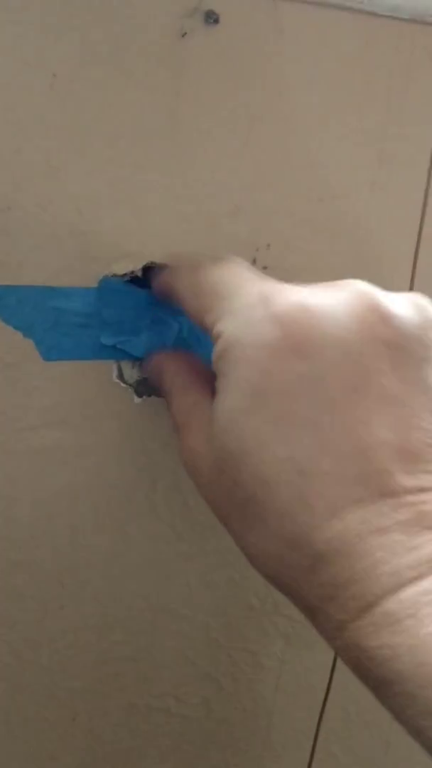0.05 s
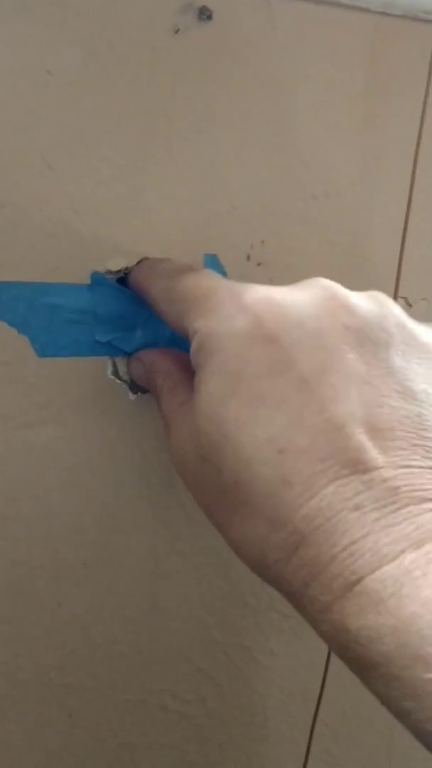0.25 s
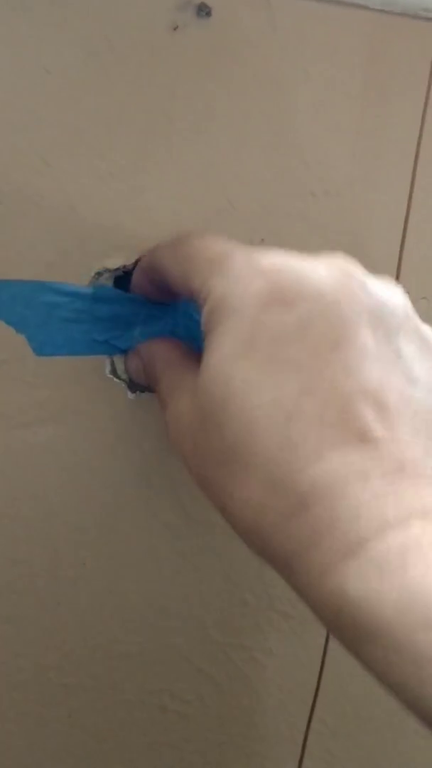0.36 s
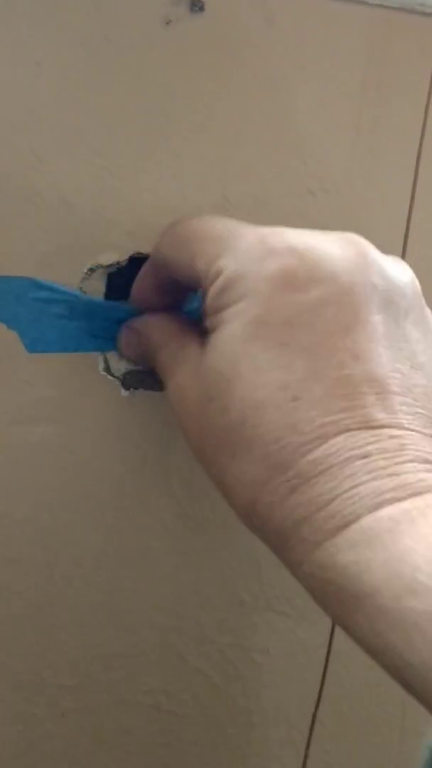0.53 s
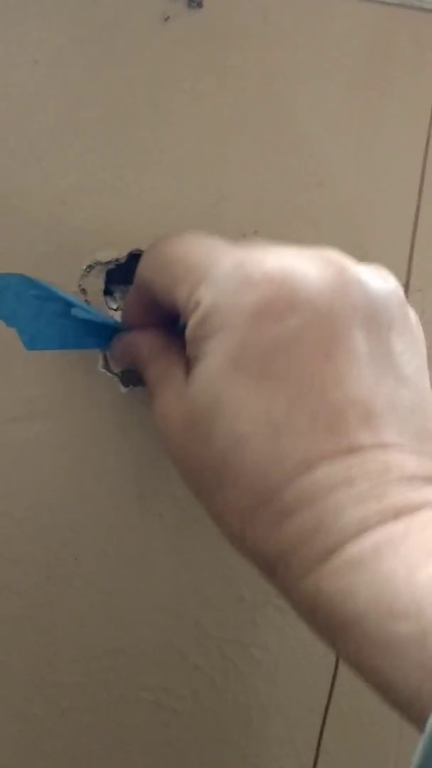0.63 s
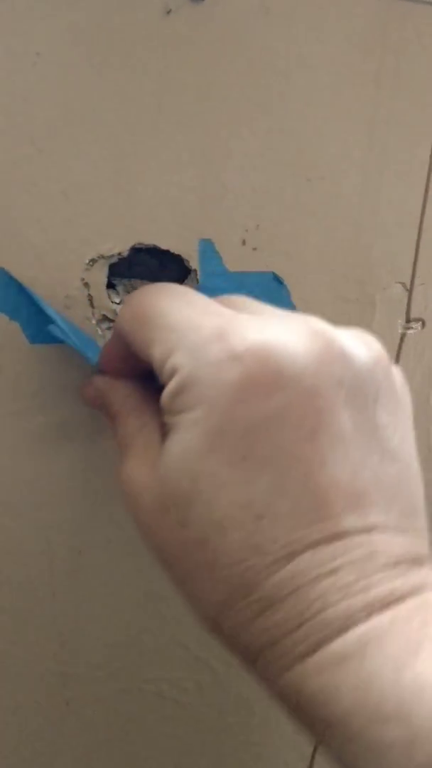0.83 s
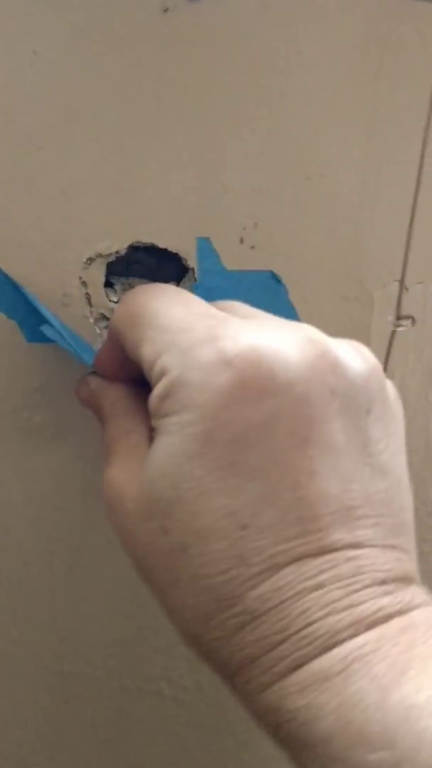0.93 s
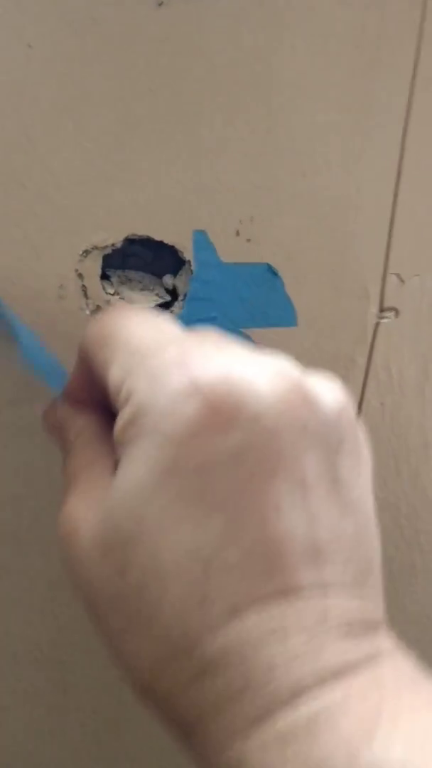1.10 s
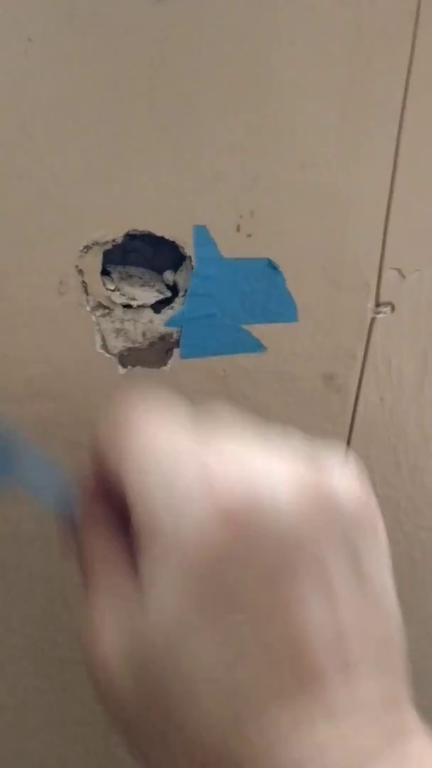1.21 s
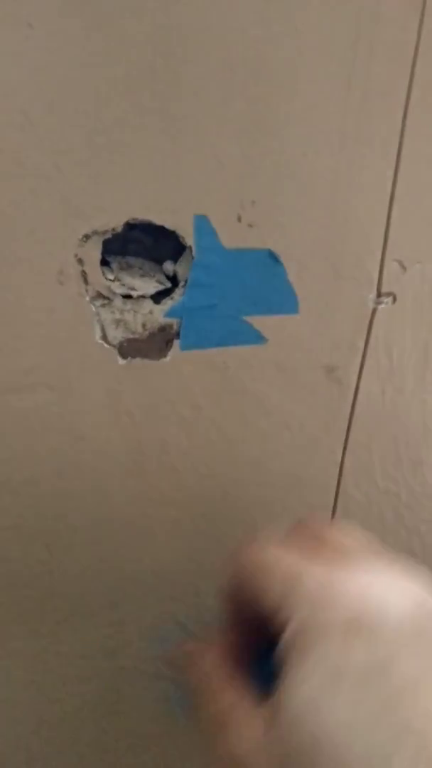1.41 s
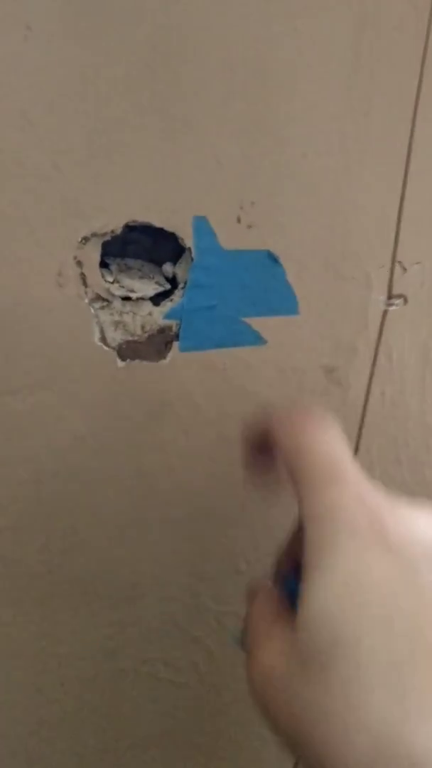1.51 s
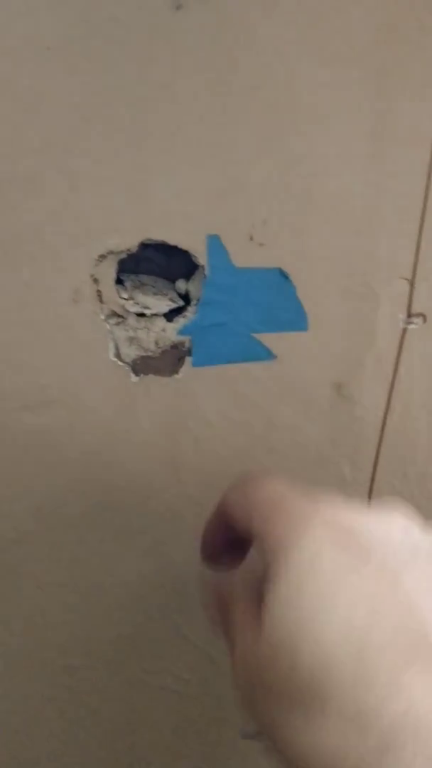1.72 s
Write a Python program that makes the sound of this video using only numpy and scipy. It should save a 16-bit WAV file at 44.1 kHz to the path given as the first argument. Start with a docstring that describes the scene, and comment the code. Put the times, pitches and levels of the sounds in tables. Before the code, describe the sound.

Close, dry crackling of painter's tape peeling from a wall, irregular snaps and soft hollow thumps of the board, a near-quiet gap, then brighter crumpling of the freed strip, indoors with faint air noise.

```python
"""Sharp snaps and dense crackle: painter's tape is peeled by hand off a hollow plaster wall, close to a phone.
Glue letting go is noise in three coloured regions: single bursts for the snaps, runs of tiny slips for the peel.
The pull knocks and drums the wall board, heard as its ringing modes; faint air noise lies behind.
Two microphone ports, each less the other after a short delay, make the stereo picture."""
import sys
import numpy as np
from scipy import signal
from scipy.fft import rfft, irfft, next_fast_len
from scipy.io import wavfile
from scipy.ndimage import map_coordinates

SR = 44100
rng = np.random.default_rng(int(sys.argv[2]) if len(sys.argv) > 2 else 0)


def magnitude_from_level(level_db):
    """Linear magnitude for a level in decibels (20 dB per decade)."""
    exponent = np.asarray(level_db, float) / 20
    return 10 ** exponent


def unload_audio(sound):
    """Save the sound as a 16-bit wav file, at the path given as the first command line argument."""
    columns = np.transpose(np.atleast_2d(sound))
    # keep every value between -1 and 1, then stretch to whole-number steps
    steps = np.round(np.clip(columns, -1, 1) * 32767)
    wavfile.write(sys.argv[1], SR, steps.astype(np.int16))


N = 77175  # 1.75 s

# single snaps of the glue, relative levels: start_s, near_3khz_db, near_6khz_db, near_12khz_db
SNAP_EVENTS = [(0.0115, -37, -51, -46.5), (0.2158, -40.5, -32, -33), (0.251, -46, -37, -44),
               (0.299, -38, -64, -66), (0.3425, -68, -34.5, -27.5), (0.3685, -42.5, -32, -36),
               (0.378, -38.5, -41, -60), (0.4046, -40, -39, -41.5), (0.4185, -39, -48, -66),
               (0.4932, -45.5, -39.5, -32.5), (0.5523, -48, -42, -28.5), (0.5609, -37.5, -16, -25),
               (0.5629, -28.5, -22.5, -40), (0.5957, -55, -31.5, -36), (0.597, -27, -33, -55),
               (0.6408, -64, -44, -37.5), (0.654, -37.5, -38.5, -42.5), (0.6765, -51, -41, -42),
               (0.708, -53, -46, -43), (0.719, -56, -43, -48), (0.781, -44, -39, -46),
               (0.7927, -47, -40, -42), (0.8016, -45, -40.5, -35), (0.811, -37.5, -43, -51),
               (0.8538, -45.5, -47, -38), (1.1208, -34, -38, -60), (1.122, -44, -39.5, -49),
               (1.139, -57, -49, -48), (1.1659, -40.5, -40.5, -38), (1.466, -40, -36, -47),
               (1.4739, -35, -51, -38), (1.4789, -32.5, -34, -48), (1.4916, -37, -26.5, -27.5),
               (1.505, -62, -47, -49), (1.5561, -44.5, -39.5, -63), (1.6702, -38.5, -42, -44),
               (1.6845, -36, -43.5, -44.5), (1.748, -36, -41.5, -55)]
# decay of a snap, one entry per tape region: t60_s
SNAP_T60_S = [
    [[.011]],
    [[.004]],
    [[.0025]],
]
# running peel, relative levels: time_s, near_3khz_db, near_6khz_db, near_12khz_db
PEEL_CURVES = [(0, -61, -57, -79), (0.02, -50, -62, -55), (0.04, -61, -70, -77), (0.1, -63, -70, -65),
               (0.122, -58, -55, -49), (0.128, -60, -72, -69), (0.157, -62.5, -63, -72),
               (0.175, -54.5, -50.5, -52), (0.2, -56.5, -57, -48), (0.21, -49, -75, -66),
               (0.24, -52, -53, -59), (0.262, -43, -42, -47), (0.285, -47, -49.5, -57),
               (0.33, -58, -65, -65), (0.36, -49, -77, -51), (0.39, -55.5, -57, -57),
               (0.43, -58.5, -63, -66), (0.54, -69, -58.5, -56), (0.575, -51, -42, -52),
               (0.62, -44, -47.5, -68), (0.672, -50.5, -50.5, -65), (0.681, -51, -41.5, -49),
               (0.697, -61, -55.5, -61), (0.712, -46, -42, -47), (0.74, -58, -57, -62),
               (0.78, -57, -58, -54.5), (0.82, -51.5, -55.5, -54.5), (0.87, -68.5, -67, -64.5),
               (1.0, -65.5, -62.5, -61.5), (1.06, -57, -56.5, -56), (1.17, -51, -51.5, -49),
               (1.19, -65, -60, -64), (1.28, -69, -69, -75), (1.31, -61.5, -57.5, -47.5),
               (1.332, -61, -46, -36.5), (1.36, -57, -51, -50), (1.38, -72, -61, -54),
               (1.404, -56, -50, -47), (1.41, -55, -40.5, -48), (1.433, -49.5, -43, -42),
               (1.44, -59, -60, -49), (1.454, -44, -36, -33.5), (1.465, -48.5, -42, -42),
               (1.496, -54, -42.5, -42.5), (1.501, -66.5, -56, -50), (1.56, -63.5, -55.5, -59.5),
               (1.72, -61, -62.5, -61), (1.75, -49.5, -55, -74)]
# colour of the tape in three regions, low to high: freq_hz, gain_db
TAPE_REGIONS = [
    [(300, -23), (800, -10.5), (1200, -13.5), (1700, -4.5), (3200, 1.5), (4200, 0.5), (5200, -40)],
    [(3600, -42), (4500, -8.5), (7000, 5), (8300, -4.5), (9600, -13)],
    [(7600, -9.5), (8800, 3), (12500, 3), (14500, 4.5), (15700, 1), (17000, -43)],
]
# recolouring of the strip once off the wall and crumpled in the fingers: freq_hz, gain_db
FREE_COLOUR = [(2200, 3), (3200, -1.5), (4500, 8), (5500, 2), (7200, -4.5), (9000, -2)]
# tugs that knock the board, relative levels: start_s, level_db, centre_hz (modes struck hardest)
KNOCK_EVENTS = [(0.1214, -23.5, 487), (0.2987, -26, 159), (.342, -28, 755), (.376, -27, 770),
                (.403, -28.5, 1000), (0.5603, -19.5, 650), (.565, -20, 126), (.715, -34.5, 714),
                (0.799, -37.5, 1360), (1.119, -33.5, 790), (1.14, -28.5, 604), (1.1635, -25.5, 1110),
                (1.166, -26.5, 200), (1.176, -32, 100), (1.316, -46, 1530), (1.346, -34.5, 1250),
                (1.386, -38, 840), (1.479, -30.5, 726), (1.557, -33, 1210), (1.67, -31.5, 744)]
# board drumming under the pull, relative level: time_s, level_db
DRUM_CURVE = [(0, -46), (.04, -55.5), (.16, -56), (.24, -46.5), (.27, -37), (.325, -53), (.345, -47.5),
              (.37, -49.5), (.45, -56.5), (.545, -61), (.562, -44.5), (.62, -54), (.76, -58.5), (.85, -62),
              (1.03, -58.5), (1.14, -47.5), (1.165, -41), (1.185, -47.5), (1.22, -57), (1.28, -56),
              (1.5, -65), (1.75, -59)]
# modes of the wall board: freq_hz, width_hz, drummed_db (relative, drumming only)
BOARD_MODES = [(100, 16.4, -5), (148.9, 17.3, 4.5), (236.7, 51, -2.5), (325.6, 113, -7.5), (790, 224, -20),
               (1444, 219, -23)]
# colour of the air noise, relative: freq_hz, gain_db
AIR_COLOUR = [(20, -43), (60, 18), (110, 1), (400, -7), (1300, -20), (3200, -8), (6000, -27),
              (16000, -14.5)]
# decay of the room tail: freq_hz, t60_s
ROOM_DECAY = [(200, 0.3), (1000, 0.024), (4000, 0.067), (14000, 0.041)]
# difference of the ports over their sum: freq_hz, ratio_db, share_in_step (-1..1)
PORT_DIFFERENCE = [(29.4, -2, 0.2), (150, -15.5, -0.27), (380, -8, 1), (830, -5.5, -0.9),
                   (1910, -0.5, -0.69), (4780, 0.5, -0.63), (5940, 0.5, 1), (7700, -2, 0.68),
                   (13100, 1.5, .2), (15800, -3, -0.61)]
# gain of the delayed other port: freq_hz, gain (linear)
CROSS_GAINS = [(100, .97), (5000, .985), (7000, .8), (10000, .3), (16000, .1)]

SNAP_RISE_S, SNAP_GAIN_DB = 0.00025, 21
STRIP_RING_HZ, STRIP_RING_WIDTH_HZ = 3150, 700  # the taut strip rings here when it snaps
SLIPS_PER_S, SLIP_SCATTER_DB, SLIP_T60_S = 6000, 3, 0.004
CLUMP_DEPTH_DB, CLUMP_KNOTS_PER_S = 2, 110
PEEL_GAIN_DB = 2.5
FREE_FROM_S = 1.29
KNOCK_GAIN_DB, KNOCK_SLOPE_DB_PER_OCTAVE, KNOCK_RISE_S = 2, 9, 0.00047
DRUM_GAIN_DB, DRUM_LUMPS_DB, DRUM_LUMP_KNOTS_PER_S = 11, 3, 59.93
AIR_RMS_DB = -54.5
TAIL_DB, ECHO_S, ECHO_DB = -13, 0.0033, -13
TOP_HZ = 15850  # upper limit of peel, drum and air
CROSS_DELAY_S = 0.0004677


def unit(x):
    """Scale to rms 1."""
    return x / np.sqrt(np.mean(x ** 2) + 1e-20)


def along(points, hz, axis=1):
    """One column of a table, read on a log frequency axis."""
    columns = np.transpose(points)
    return np.interp(np.log(hz + 1), np.log(columns[0] + 1), columns[axis])


def curves(rows):
    """One value per sample for each column after the time."""
    time_s, *columns = np.transpose(rows)
    return [np.interp(np.arange(N) / SR, time_s, c) for c in columns]


def wobble(knots_per_s):
    """A smooth random curve through normal-distributed knots."""
    position = np.arange(N) * min(knots_per_s, 1000) / SR
    return map_coordinates(rng.standard_normal(2000), [position])


def filtered(x, response):
    """x shaped by a complex response of frequency."""
    size = next_fast_len(N + SR // 2)
    hz = np.fft.rfftfreq(size, 1 / SR)
    return irfft(rfft(x, size) * response(hz), size)[..., :N]


def resonance(f, hz, width_hz):
    """A causal resonance of peak gain 1."""
    return 1j * f * width_hz / (hz * hz - f * f + 1j * f * width_hz)


def snaps():
    """Glue snaps: noise bursts a few ms long, shortest in the treble, each with its own colour; two renderings."""
    t = np.arange(1024) / SR - 0.002
    rise = np.clip(1 - np.exp(-t / SNAP_RISE_S), 0, 1)
    shape = magnitude_from_level(-60 * t / np.array(SNAP_T60_S)) * rise
    hz = np.fft.rfftfreq(len(t), 1 / SR)
    ring = [resonance(hz + 1, STRIP_RING_HZ, STRIP_RING_WIDTH_HZ), 1, 1]
    colour = np.array([magnitude_from_level(along(c, hz)) * r for c, r in zip(TAPE_REGIONS, ring)])[:, None]
    out = np.zeros((2, N + SR))
    for start_s, *levels_db in SNAP_EVENTS:
        noise = rng.standard_normal((3, 2, len(t)))
        burst = irfft(rfft(noise * shape) * colour)
        burst /= np.linalg.norm(burst, axis=2, keepdims=True)
        gain = magnitude_from_level(SNAP_GAIN_DB + np.array(levels_db))[:, None, None]
        start = round((start_s + t[0]) * SR)
        out[:, start:start + len(t)] += (burst * gain).sum(axis=0)
    return out[:, :N]


def peel():
    """Tiny slips of uneven size come in clumps and rattle the tape."""
    size = magnitude_from_level(SLIP_SCATTER_DB * np.minimum(rng.exponential(size=N), 4))
    size = size * (rng.random(N) < SLIPS_PER_S / SR)
    power_decay = magnitude_from_level(-120 / SLIP_T60_S / SR)
    gate = np.sqrt(np.abs(signal.lfilter([1], [1, -power_decay], size ** 2)))
    wobbles = np.array([wobble(CLUMP_KNOTS_PER_S) for _ in TAPE_REGIONS])
    clumps = magnitude_from_level(CLUMP_DEPTH_DB * wobbles)[:, None]
    slips = unit(gate * clumps * rng.standard_normal((2, N)))
    levels = magnitude_from_level(np.array(curves(PEEL_CURVES)) + PEEL_GAIN_DB)[:, None]
    return tape(slips * levels)


def tape(x):
    """Each of three excitations takes the colour of one region; white noise keeps its rms."""
    hz = np.linspace(0, SR / 2, num=2000)
    out = 0
    for excitation, colour in zip(x, TAPE_REGIONS):
        rms_gain = np.sqrt(np.mean(magnitude_from_level(along(colour, hz)) ** 2))
        out = out + filtered(excitation, lambda f: magnitude_from_level(along(colour, f))) / rms_gain
    return out


def freed(x):
    """The tape's sound, recoloured after it has left the wall."""
    recoloured = filtered(x, lambda f: magnitude_from_level(along(FREE_COLOUR, f)))
    return np.where(np.arange(N) / SR < FREE_FROM_S, x, recoloured)


def knocks():
    """Each tug rings the modes of the board together, most of all those near its centre."""
    out, t = np.zeros((2, N + SR)), np.arange(SR // 8) / SR
    for start_s, level_db, centre_hz in KNOCK_EVENTS:
        start = round(start_s * SR)
        for hz, width_hz, _ in BOARD_MODES:
            octaves_off = abs(np.log2(hz / centre_hz))
            mode_db = level_db + KNOCK_GAIN_DB - KNOCK_SLOPE_DB_PER_OCTAVE * octaves_off
            phase_cycles = rng.random() * np.array([[0], [1]])  # random in the second rendering only
            envelope = np.exp(-np.pi * width_hz * t) * (1 - np.exp(-t / KNOCK_RISE_S))
            ring = np.sin(2 * np.pi * (hz * t + phase_cycles)) * envelope
            out[:, start:start + len(t)] += magnitude_from_level(mode_db) * ring
    lowest_hz = BOARD_MODES[0][0]  # little sound below the lowest mode
    return filtered(out[:, :N], lambda f: (1j * f / (lowest_hz + 1j * f)) ** 2)


def drum():
    """A lumpy noise push rings the modes of the board, the low ones strongest."""
    level_db, = curves(DRUM_CURVE)
    lumps = magnitude_from_level(DRUM_LUMPS_DB * wobble(DRUM_LUMP_KNOTS_PER_S))
    push = rng.standard_normal((2, N)) * lumps

    def board(f):
        """Sum of the modes, alternating in sign."""
        return sum((-1) ** k * magnitude_from_level(db) * resonance(f, hz, width_hz)
                   for k, (hz, width_hz, db) in enumerate(BOARD_MODES))

    return magnitude_from_level(level_db + DRUM_GAIN_DB) * unit(filtered(push, board))


def air():
    """Steady coloured noise behind everything."""
    noise = rng.standard_normal((2, N))
    return magnitude_from_level(AIR_RMS_DB) * unit(filtered(noise, lambda f: magnitude_from_level(along(AIR_COLOUR, f))))


def room(x):
    """One early bounce and a short noise tail whose decay time depends on frequency."""
    hz, t, z = signal.stft(rng.standard_normal((2, SR // 4)), SR, nperseg=128)
    decay = magnitude_from_level(-60 * t / along(ROOM_DECAY, hz)[:, None])
    tail = signal.istft(z * decay, SR, nperseg=128)[1]
    tail = np.pad(tail / np.linalg.norm(tail[0]), ((0, 0), (60, 0)))  # delayed 60 samples
    bounce = filtered(x, lambda f: magnitude_from_level(ECHO_DB) * np.exp(-2j * np.pi * f * ECHO_S))
    return x + bounce + magnitude_from_level(TAIL_DB) * signal.fftconvolve(x, tail, axes=1)[:, :N]


def ports(both):
    """Two renderings become two ports: their difference is partly in step with their sum."""
    def split(f):
        """Gains of the in-step and the unrelated part of the difference."""
        share = np.clip(along(PORT_DIFFERENCE, f, axis=2), -1, 1)
        return magnitude_from_level(along(PORT_DIFFERENCE, f)) * [share, np.sqrt(1 - share ** 2)]

    diff = filtered(both, split).sum(axis=0)
    return np.array([both[0] + diff, both[0] - diff]) / 2


def scene():
    """Snaps and knocks in the room, with peel, drum and air, at the two ports."""
    struck = room(freed(snaps()) + knocks())
    running = filtered(freed(peel()) + drum() + air(), lambda f: f < TOP_HZ)
    return ports(struck + running)


def band_limit(x):
    """A steep low-pass at the top of the band."""
    return signal.sosfilt(signal.butter(12, 16980, fs=SR, output="sos"), x)


def record(dry):
    """Each channel is its port less the delayed, filtered other port."""
    def cross(f):
        """Gain and delay of the other port."""
        return np.clip(along(CROSS_GAINS, f), 0, 1) * np.exp(-2j * np.pi * f * CROSS_DELAY_S)

    mix = dry - filtered(dry[::-1], cross)
    return band_limit(mix)


dry = scene()
out = record(dry)
unload_audio(out)
```